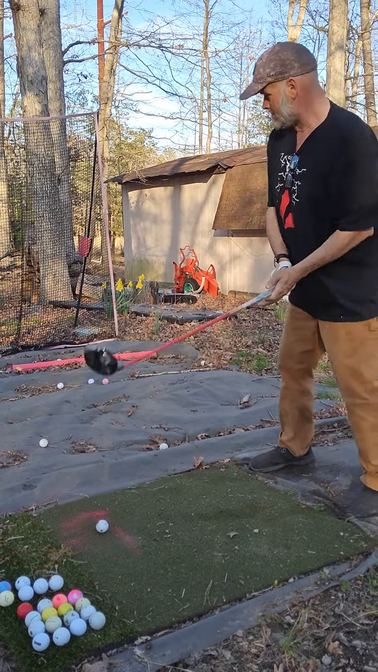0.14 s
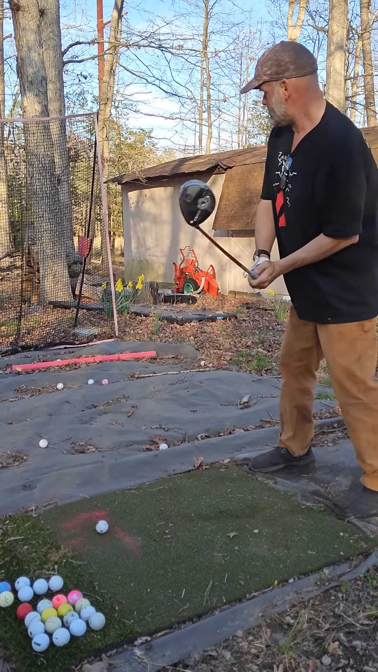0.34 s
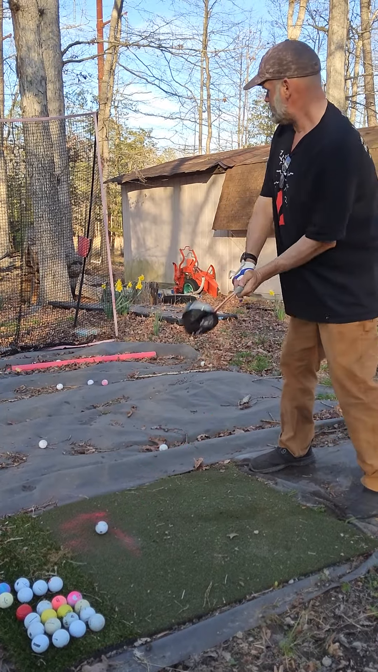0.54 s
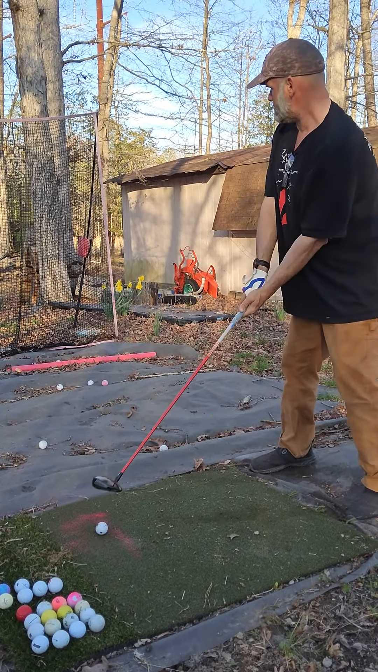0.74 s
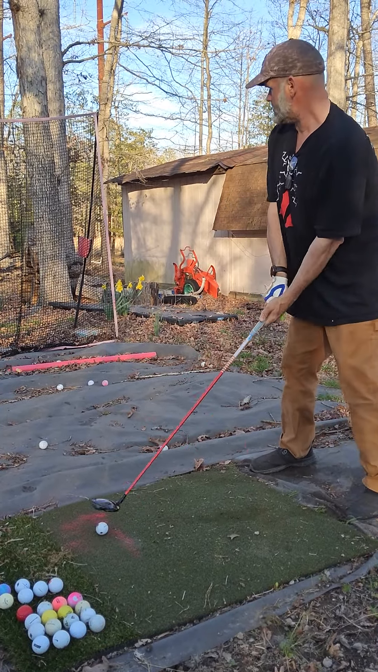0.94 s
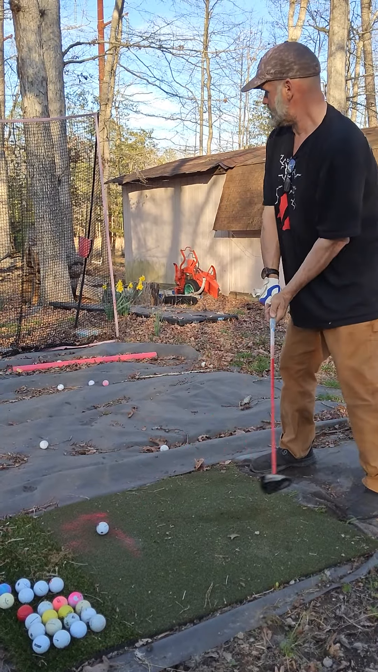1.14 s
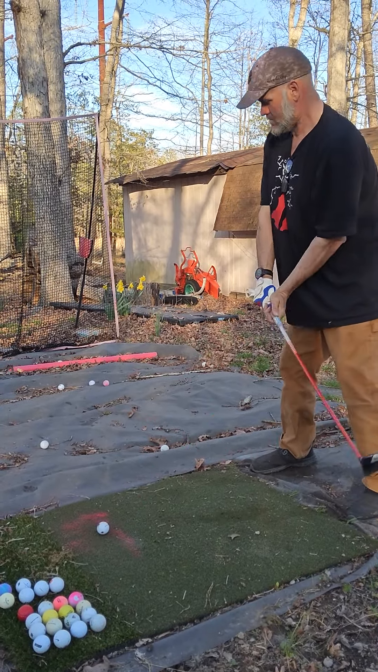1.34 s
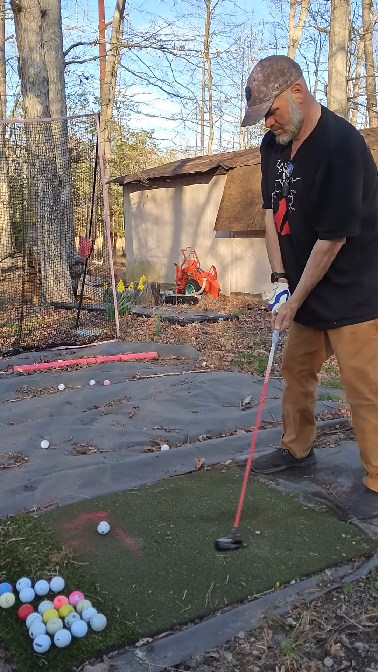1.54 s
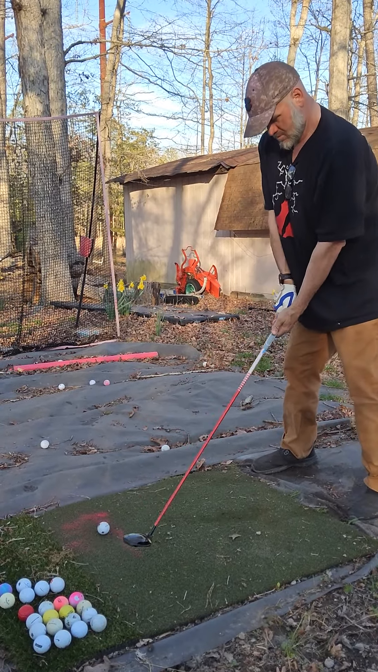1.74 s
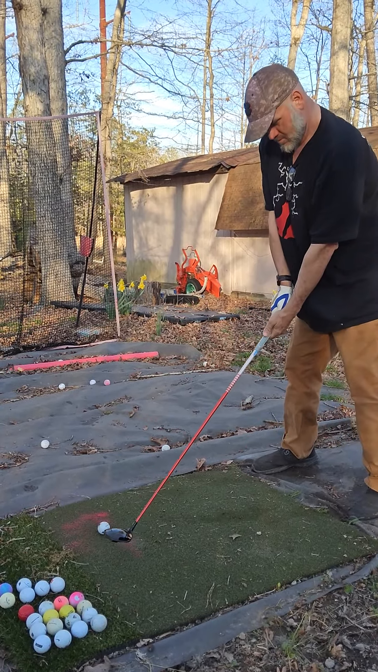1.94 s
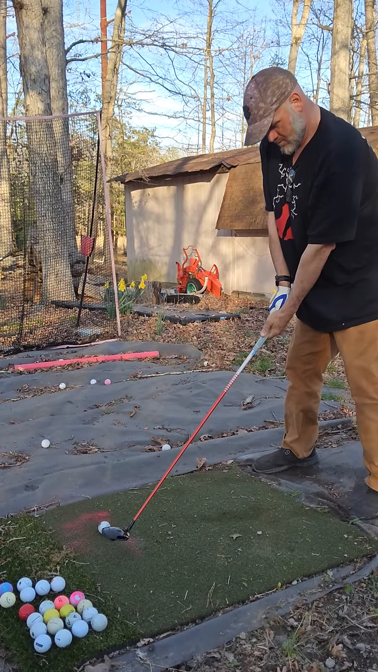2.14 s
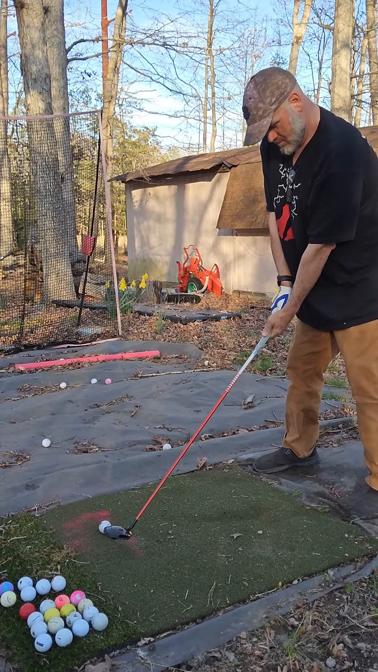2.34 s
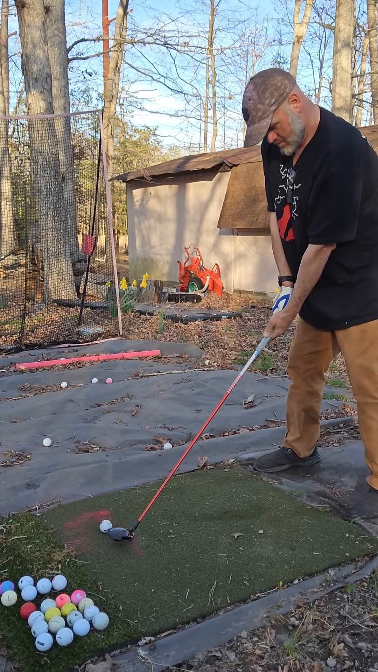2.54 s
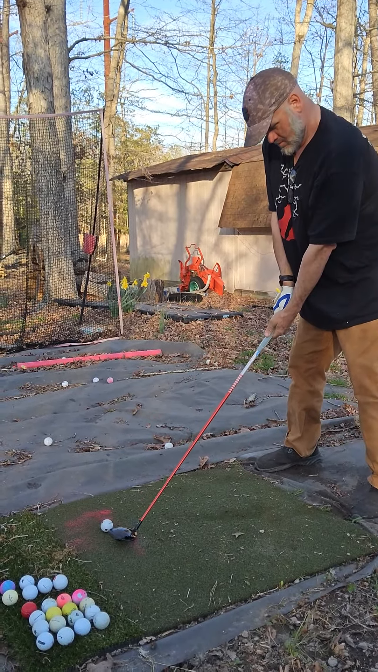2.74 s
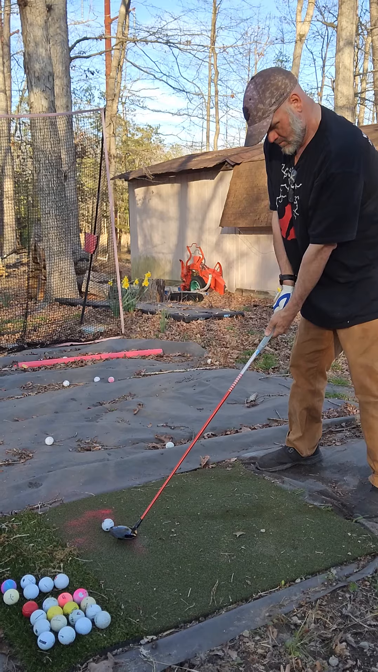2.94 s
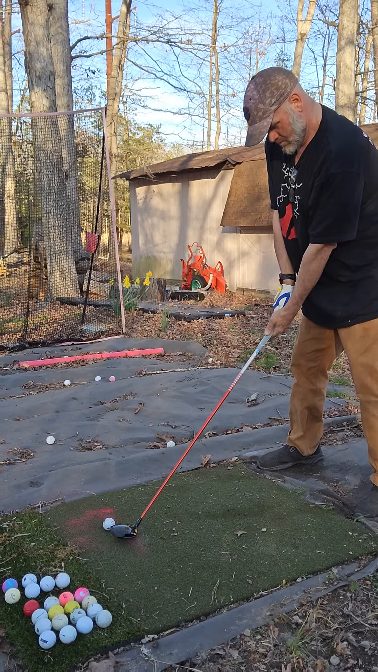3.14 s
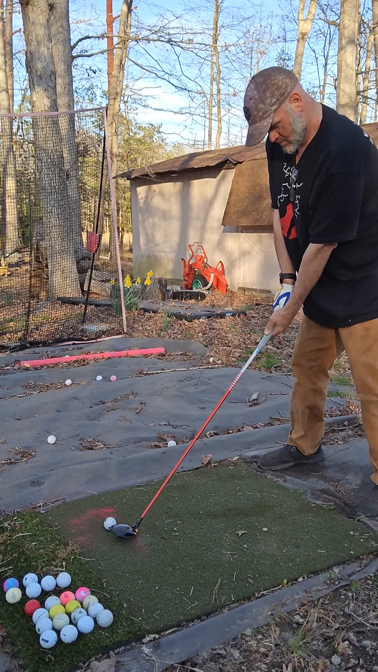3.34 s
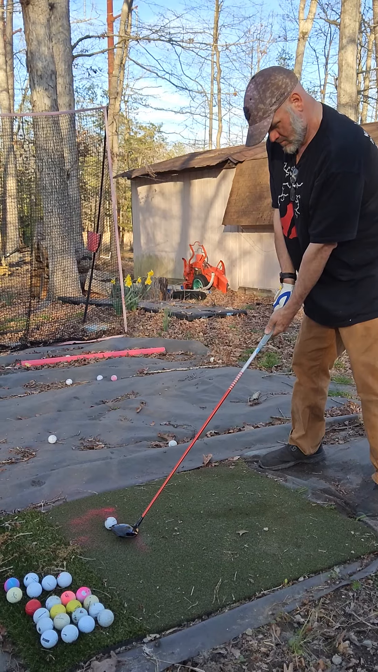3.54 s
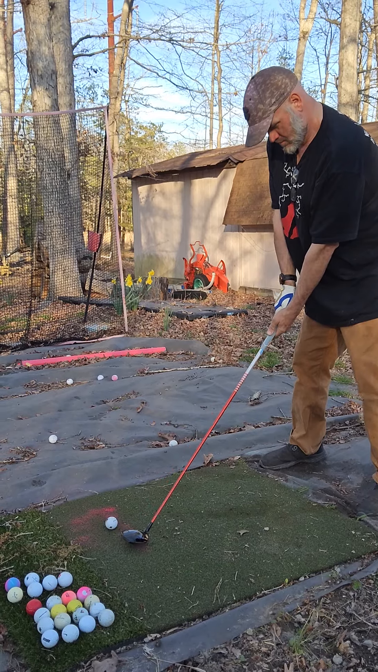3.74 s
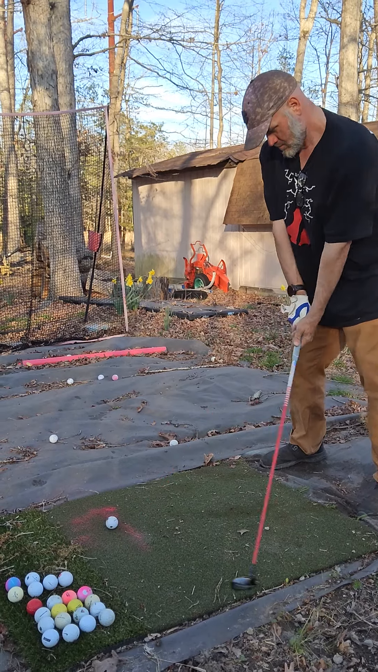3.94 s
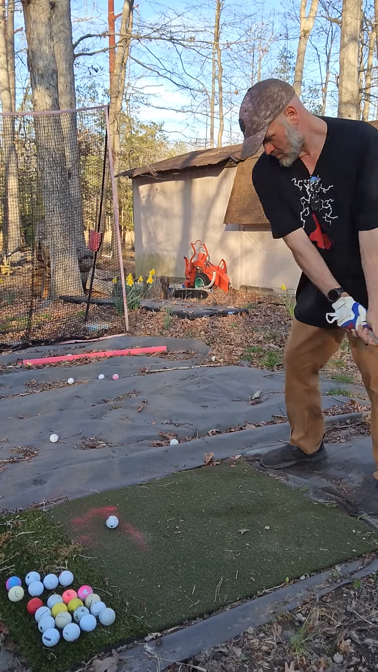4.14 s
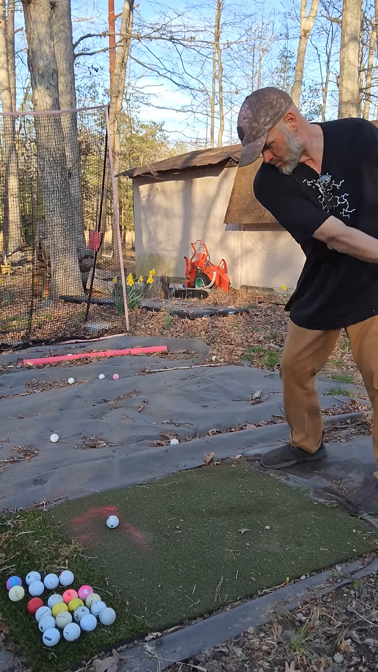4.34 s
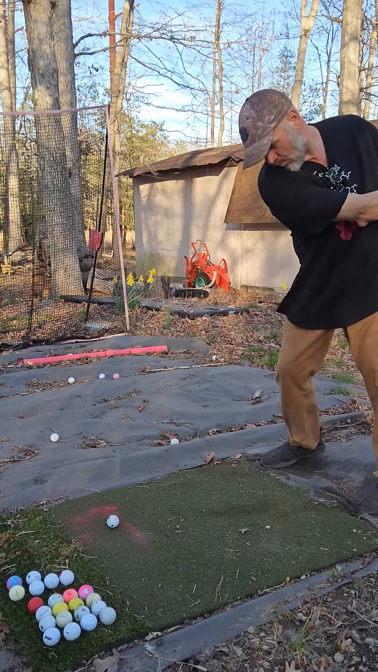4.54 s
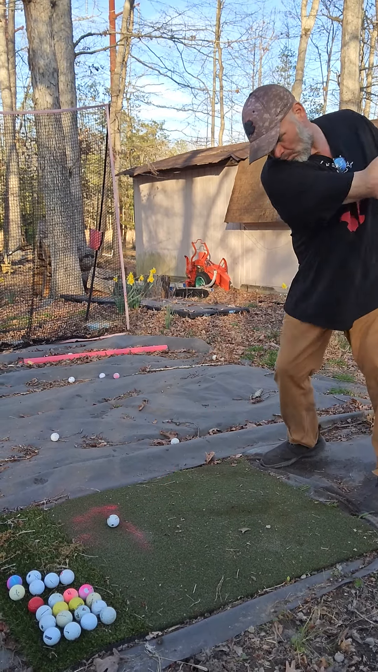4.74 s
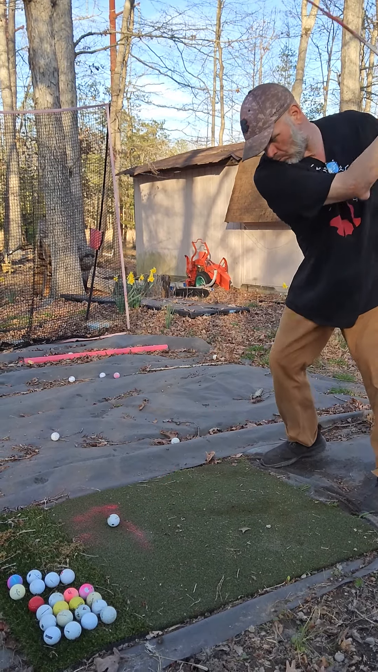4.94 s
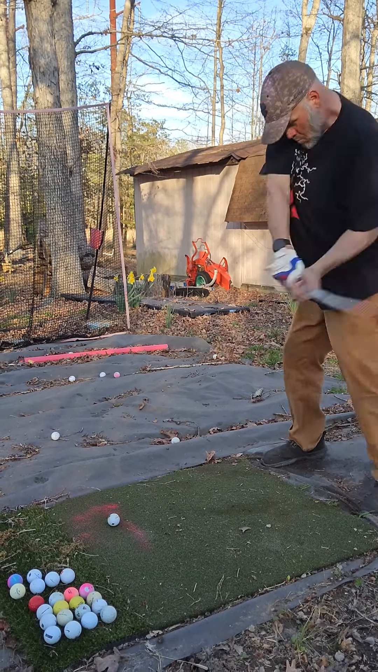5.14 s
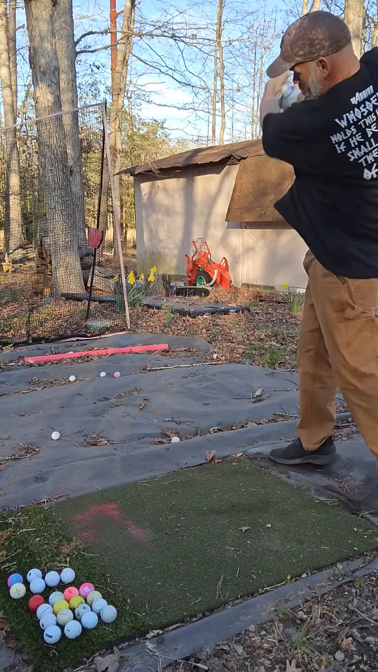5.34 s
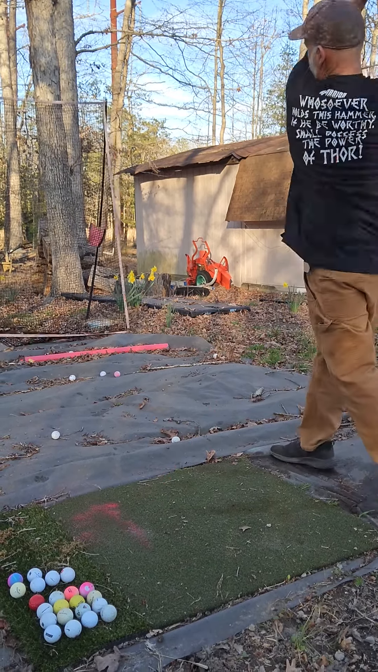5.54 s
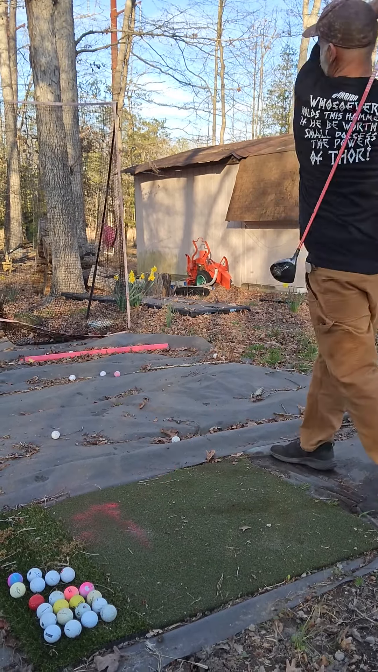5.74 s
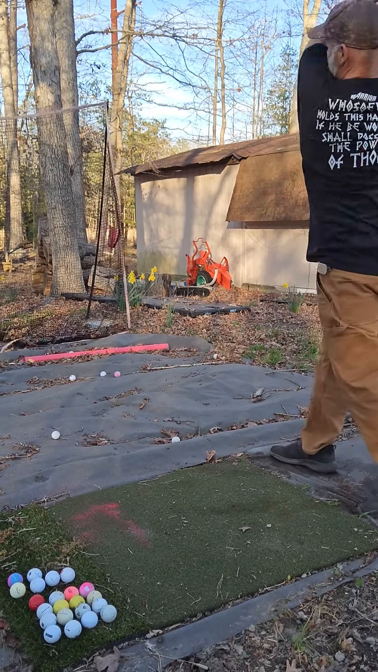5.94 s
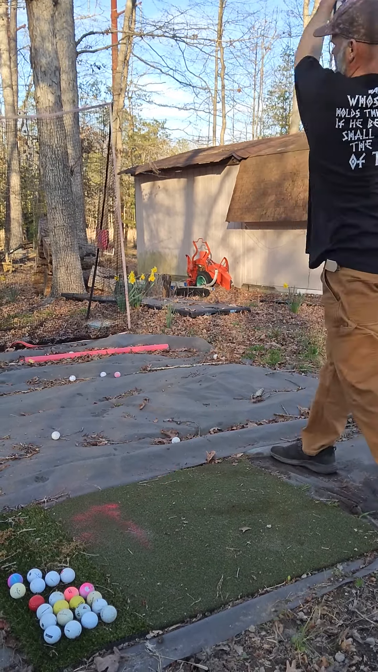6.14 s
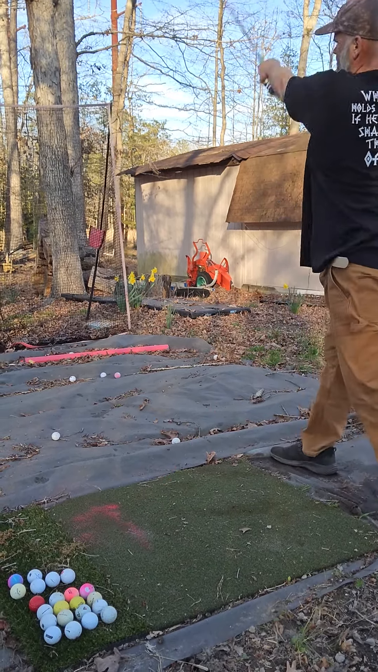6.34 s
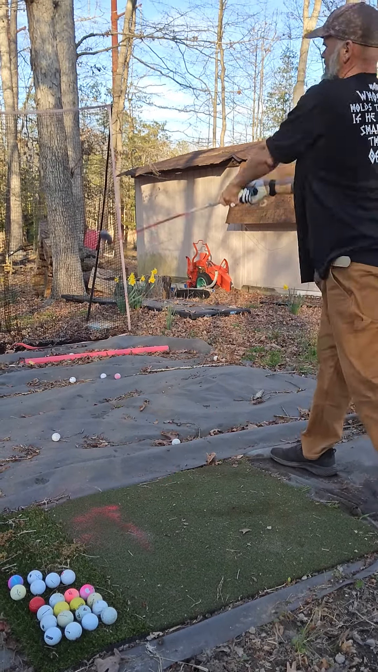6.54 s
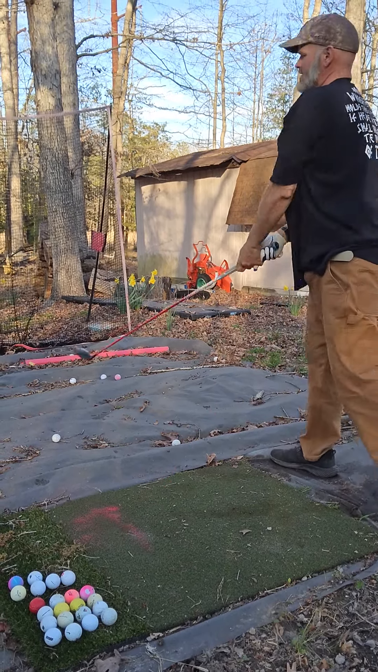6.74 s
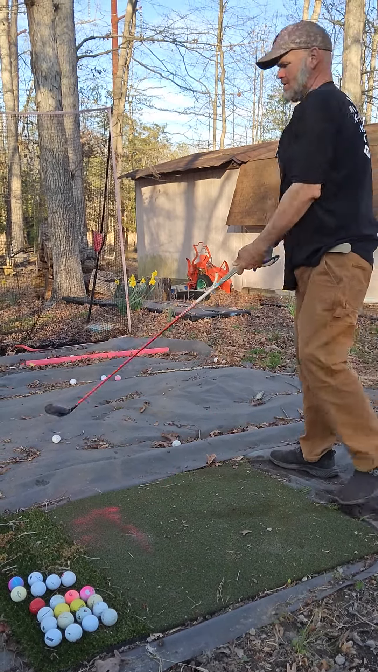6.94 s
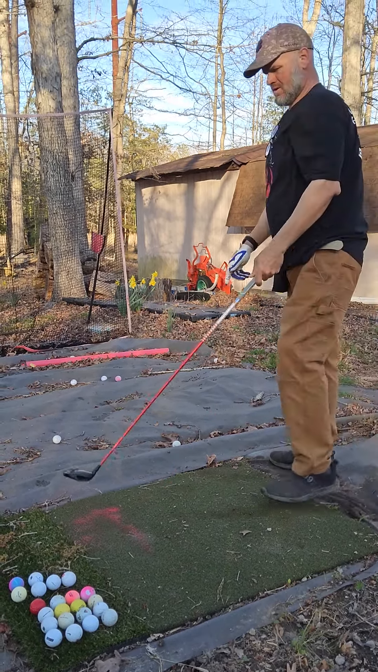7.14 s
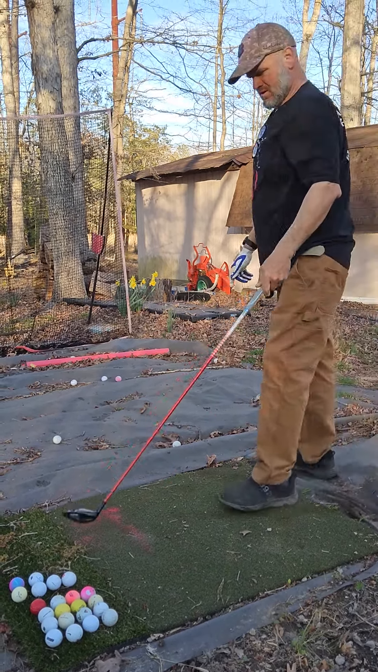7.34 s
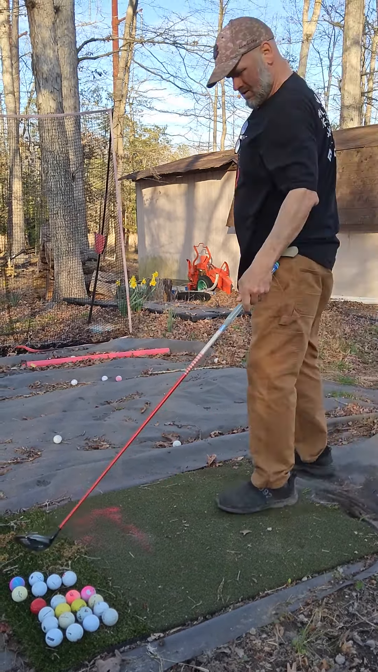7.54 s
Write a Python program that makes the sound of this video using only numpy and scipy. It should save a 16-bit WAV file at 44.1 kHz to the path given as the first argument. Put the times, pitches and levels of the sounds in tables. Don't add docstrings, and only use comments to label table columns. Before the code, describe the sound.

A near microphone in a backyard among trees picks up low distant traffic, faint hiss, bird chips and a quick trill. After a long quiet wait comes a split-second whoosh and one hard, hollow-metal crack that dominates everything, scattering off the trunks. The ball slaps into netting a tenth of a second later; netting and sheet rustle and settle, the ball drops with a soft pat, and gritty steps finish.

```python
import sys
import numpy as np
from scipy import signal
from scipy.fft import rfft, irfft, next_fast_len
from scipy.io import wavfile
from scipy.ndimage import uniform_filter1d

SR = 44100
rng = np.random.default_rng(int(sys.argv[2]) if len(sys.argv) > 2 else 0)


def elevation(decibels):
    levels = np.asarray(decibels, float)
    return 10 ** (levels / 20)


def dump_mix(stems):
    frames = np.atleast_2d(stems).T
    limited = np.clip(frames, -1, 1)
    pcm = np.round(limited * 32767).astype(np.int16)
    wavfile.write(sys.argv[1], SR, pcm)


N = 339129

# time_s, level_db
TRAFFIC = [(0, -62), (1.2, -65), (2.2, -66), (2.9, -69), (3.7, -68.5), (4.6, -71), (5.2, -69), (6.2, -75.5),
           (7.0, -70.5), (7.69, -77)]
# time_s, level_db
RUMBLE_SWELL = [(0, -2.5), (1.0, -0.5), (1.7, 1), (2.6, 0), (3.7, 0), (4.3, -2), (4.7, -2.5), (5.2, 3.5),
                (5.75, -1.5), (6.4, -1.5), (7.0, -0.5), (7.69, -3.5)]
# frequency_hz, density_db
RUMBLE_COLOUR = [(12, -46), (20, -14.5), (34, -3), (83, 1.5), (113, -2), (152, -12.5), (184, -14.5),
                 (259, -19), (294, -25), (338, -27), (420, -37.5), (550, -60.5), (920, -120)]
WASH_COLOUR = [(180, -42), (300, -11), (405, -9), (828, 0.5), (1510, -6), (1920, -17), (2400, -21.5),
               (3410, -28.5), (3770, -43), (6000, -47), (7800, -68.5), (13200, -120)]
HISS_COLOUR = [(2120, -21.5), (3600, -3), (3670, -5), (7660, -15.5), (10800, -16.5), (15100, -11.5),
               (16000, -13)]
# frequency_hz, likeness (-1 to 1)
LIKENESS = [(60, 0.99), (150, 0.92), (380, 0.71), (950, 0.38), (2380, -0.35), (5980, -0.2), (15000, 0.044)]
# time_s, firing_hz, level_db
ENGINES = [
    [(0, 154, -62.5), (1.2, 156, -62.5), (2.4, 151, -59), (2.65, 146.3, -59.5), (4.3, 139.5, -59.5),
     (4.6, 140.6, -63), (5.1, 133, -70), (5.4, 134, -89)],
    [(.55, 86, -78), (.75, 85.2, -50), (1.4, 85.87, -61), (1.6, 79, -58), (2.3, 76.1, -55.5),
     (2.55, 73.3, -77)],
    [(7.1, 166, -88.5), (7.25, 163.4, -60.5), (7.69, 154, -65.5)],
]
# time_s, level_db
WHINE = [(0, -80), (.6, -86), (1.2, -85), (1.7, -78), (2.3, -82.5), (2.44, -71.5), (2.55, -87), (2.8, -110)]

# time_s, pitch_hz, level_db
NEAR_BIRD = [
    [(4.787, 2200, -81.5), (4.8, 2610, -76.5), (4.812, 2350, -72.5), (4.828, 2800, -64.5),
     (4.84, 2210, -69), (4.85, 2460, -66), (4.862, 2214, -66.5), (4.89, 2010, -70.5), (4.905, 1880, -83.5)],
    [(4.998, 2795, -82.5), (5.012, 2620, -70.5), (5.03, 2450, -61.5), (5.046, 1990, -75),
     (5.054, 1950, -77.5), (5.064, 2080, -60.5), (5.078, 2170, -65.5), (5.09, 2100, -73),
     (5.098, 1980, -79)],
]
# start_s, level_db, pitch_hz
CHIPS = [
    (.305, -77, 3410),
    (.797, -73.5, 3410),
    (1.255, -75, 3410),
    (1.694, -75, 3430),
    (2.137, -69, 3490),
    (2.572, -78, 3500),
]
# start_s, length_s, start_hz, end_hz, level_db
SLURS = [(.37, .10, 3000, 2960, -88), (.47, .2, 3130, 3020, -86), (1.65, .03, 3240, 3220, -82),
         (1.96, .04, 3240, 3260, -83), (2.92, .19, 3370, 2660, -81), (2.98, .18, 3250, 2680, -86),
         (3.10, .11, 2660, 2760, -84), (3.42, .2, 2310, 2260, -86), (3.60, .05, 2400, 2300, -80),
         (3.65, .09, 2310, 2270, -85), (4.008, .19, 3400, 2670, -82), (4.05, .15, 3280, 2680, -83),
         (4.18, .08, 2680, 2750, -88), (4.46, .09, 2620, 2580, -87)]
# top_s, peak_db
TRILL = [(2.122, -77), (2.2667, -72.5), (2.39, -69.5), (2.5033, -71.5), (2.6233, -71.5), (2.7392, -71.5),
         (2.844, -72.5), (2.9542, -71.5), (3.063, -72.5), (3.162, -72.5), (3.264, -71), (3.3715, -72.5),
         (3.486, -70)]

# time_s, level_db
FLUTTER = [(4.99, -85), (5.035, -71), (5.06, -67), (5.095, -66), (5.11, -75), (5.14, -77), (5.16, -95)]
# start_s, length_s, start_hz, end_hz, level_db
VORTICES = [
    (5.128, .022, 440, 500, -53),
    (5.140, .020, 500, 590, -43),
    (5.154, .026, 590, 680, -25),
    (5.1785, .013, 640, 720, -24),
    (5.1905, .021, 750, 725, -22.5),
    (5.2122, .0090, 700, 690, -20),
    (5.2190, .005, 520, 450, -30),
]
# time_s, level_db
SWISH = [(5.10, -90), (5.135, -69), (5.156, -57), (5.172, -42), (5.192, -33), (5.21, -33), (5.2165, -36),
         (5.2185, -58), (5.2225, -52), (5.228, -50), (5.24, -65)]
# frequency_hz, density_db
SWISH_COLOUR = [(60, -30), (120, -17), (300, -5), (700, -9), (1300, -12), (2200, -14), (3600, -20),
                (5700, -27), (8000, -35), (10500, -33), (16000, -38.5)]
# centre_s, level_db, pitch_hz, length_cycles, sign
PUSHES = [(5.2249, -10.5, 400, 1.0, 1), (5.2275, -25, 220, .9, 1), (5.2255, -24, 1900, 2.0, 1),
          (5.2205, -33, 2000, 7, 1), (5.2170, -36, 2300, 5, 1), (5.2258, -24, 900, 1.0, -1),
          (5.2400, -36, 150, 1.5, 1), (5.2520, -38, 160, 1.5, -1), (5.3195, -29, 72, 1.7, -1),
          (5.3193, -27, 230, .8, -1), (5.3181, -25, 900, 1.0, -1), (5.3090, -30, 600, 1.3, -1),
          (5.3304, -23, 720, 2.6, -1), (5.3343, -32, 800, 1.5, 1), (5.3550, -39, 110, 1.2, 1),
          (5.3120, -40, 150, 1.5, 1), (5.3420, -35, 210, 1.5, 1), (6.0405, -40, 400, 1.4, 1),
          (6.0415, -45, 750, 2.0, 1), (6.7270, -58, 1200, 2.5, 1), (6.8010, -48, 1250, 1.6, 1),
          (6.9000, -60, 1400, 2.5, 1)]
# pitch_hz, level_db, t60_s
HEAD = [(1950, -3.5, .005), (2900, -8, .004), (4300, -13, .006), (5440, -9, .014), (6750, -2, .009),
        (7900, -9, .004), (9220, -10, .004), (10400, -6, .009), (11000, -9, .006), (12300, -15, .005),
        (13600, -11, .006)]

# frequency_hz, density_db
RUSTLE_DULL = [(180, -40), (300, -5.5), (414, -14.5), (544, -7), (986, -4), (1600, -4.5), (2400, -5),
               (3300, -6.5), (5250, -30), (9830, -32.5), (10800, -40), (14000, -28)]
RUSTLE_BRIGHT = [(2060, -55.5), (3500, 6.5), (3970, 7.5), (5060, 7), (7950, 3.5), (9320, 2), (15100, -4),
                 (16000, -15.5)]
# top_s, level_db, rise_s, hold_s, t60_s
SLEEVES = (-4.5, 0, 0), [(4.05, -95.5, .2, 0.19, 3.5), (4.6, -91, 0.61, 0.073, 2.6),
           (5.2, -91.5, 0.38, .02, .05)]
NET = (-5.5, 2.3, -0.3), [(5.2315, -35, 0.001, 0.0088, 0.049), (5.242, -41, 0.0046, 0.015, 0.35),
       (5.378, -43.5, 0.13, 0.034, 0.57), (5.646, -60.5, 0.17, 0.018, 0.41)]
BALL_IN_NET = (1.5, -17.5, -.5), [(5.316, -39.5, .03, 0.0051, 0.15)]
SHEET = (-5, 5.2, -0.5), [(5.896, -54, 0.18, 0.044, 0.64), (6.04, -49.5, 0.0081, 0, 0.2),
         (6.17, -78.5, 0.0077, 0.0041, 0.067), (6.28, -75, 0.04, 0, 0.41), (6.352, -78, 0.064, 0.012, 1.15),
         (6.48, -90, 0.084, 0.095, 0.69)]
GRIT = (-8, -0.92, -0.59), [(6.58, -68, 0.061, 0.299, 0.13), (6.63, -85, .06, 0.022, .4),
        (6.8, -68, 0.0034, 0.011, 0.17), (6.93, -85, 0.045, 0.08, 0.53)]
GRAVEL = (-9.5, -3.1, 0.6), [(7.175, -67, 0.013, 0.032, 0.24), (7.222, -61, 0.044, 0.004, 0.24),
          (7.268, -65.5, 0.045, 0, .45)]
SCUFF = (1.86, -34, -1), [(6.74, -90.5, .04, 0.023, 0.42), (6.89, -78.5, 0.056, 0.012, 0.18),
         (6.97, -87, 0.12, 0.048, 0.68), (7.37, -73.5, 0.021, 0.04, 0.32), (7.405, -63, 0.06, 0.021, 0.47),
         (7.515, -67.5, 0.053, 0.013, 0.77), (7.68, -70.5, 0.17, .02, .5)]

# start_s, peak_db, left_right_db, pitch_hz, t60_s
SNAPS = [(5.3178, -37, -0.5, 1700, 0.012), (5.3191, -21, -4, 4600, 0.012), (5.3290, -21, -7, 4370, 0.015),
         (5.3497, -21.5, -4, 5450, 0.02), (5.863, -34, -3, 10000, 0.012), (5.8993, -39, -2, 2500, 0.028),
         (5.897, -35.5, -7, 9290, 0.026), (6.0377, -36, 5, 10100, 0.032), (6.04, -37.5, -19, 2920, 0.049),
         (6.0564, -47, 4.5, 5230, 0.012), (6.1709, -45, -10, 6200, 0.013), (6.1712, -51, -2, 10240, 0.012),
         (6.4565, -54, 0, 7660, 0.012), (6.559, -58, 1.5, 4490, 0.011), (6.6288, -45.5, 7, 12700, 0.0056),
         (6.627, -57, -4, 4120, 0.012), (6.657, -49, 0, 4660, 0.012), (6.7255, -40, -1, 6550, 0.0048),
         (6.7544, -55, -7, 4570, 0.012), (6.7715, -48, -1, 5180, 0.012), (6.8008, -36, 15, 4000, 0.006),
         (6.897, -49.5, -1, 4650, 0.013), (7.172, -55, -7, 3510, 0.012), (7.177, -56, 5, 9600, 0.011),
         (7.187, -49, 0.5, 5180, 0.02), (7.2124, -44, -4, 5100, 0.05), (7.274, -52, -13, 4020, 0.014),
         (7.39, -46.5, -9, 4800, 0.023), (7.378, -57.5, -1.5, 2190, 0.012), (7.466, -49, -6, 6500, 0.01),
         (7.506, -61, -3.5, 2120, 0.012), (7.58, -58, -9, 7500, 0.0096), (7.633, -47, -7, 2340, 0.018),
         (7.648, -47.5, -4, 2980, 0.018)]
# start_s, peak_db, left_right_db, pitch_hz, t60_s
MAT_GRIT = [
    (5.2238, -30, 0, 13000, .010),
    (5.2243, -27, -3, 3300, .008),
    (5.2248, -20, 0, 9500, .008),
    (5.2258, -26, 0, 5800, .005),
    (5.2261, -24, -2, 9500, .004),
]
# start_s, peak_db, left_right_db, pitch_hz, t60_s
CLOTH_TICKS = [
    (1.0854, -75, 1.0, 8820, 0.015),
    (1.5494, -71, 0.0, 12100, 0.015),
    (4.0372, -72, -2.0, 10100, 0.017),
    (4.0544, -61, -1.6, 9240, 0.013),
    (4.2274, -70, -0.15, 13100, 0.014),
    (4.8784, -74, 1, 10610, 0.02),
]
# start_s, peak_db, left_right_db, pitch_hz, t60_s
SETTLING = [(5.368, -20, -4, 4800, .015), (5.4555, -38, 0, 5500, .012), (5.557, -44, -1, 1490, .008),
            (5.596, -44, 0, 5000, .01), (5.728, -38.5, -1, 6730, 0.0088), (5.813, -50, -2, 5260, 0.013),
            (7.1573, -63, 2, 1092, 0.013), (7.3584, -46, -2, 1015, .015), (7.403, -48, -5, 1290, .02),
            (7.465, -49, -5, 1020, .02), (7.512, -50, -7, 1520, .015), (7.5704, -49.5, -3, 1334, 0.014)]

# centre_hz, width_hz, lift_db
PORTS = [(2700, 100, -1), (3420, 240, 2), (5100, 230, 1), (9670, 300, 3)]
# frequency_hz, left_right_db
SHADING = [(1200, 0), (2000, -1.5), (3000, -5), (4300, -4), (5500, 1), (7500, 3), (13000, 3.5)]

STRIKE_S, STRIKE_DB, STRIKE_LAG = 5.2299, -6, 4.0
HEAD_LAG, NET_LAG = 6, -5


def rms_one(x):
    return x / np.sqrt(np.mean(x ** 2) + 1e-20)


def in_time(rows):
    s, *columns = np.transpose(rows)
    return [np.interp(np.arange(N) / SR, s, c) for c in columns]


def at_hz(points, hz):
    table_hz, values = np.array(points)[:, :2].T
    return np.interp(np.log(hz), np.log(table_hz), values)


def drift(rate):
    r = np.exp(-40 * np.pi * rate / SR)
    white = rng.standard_normal(N // 20 + 4002)
    slow = signal.lfilter([1], [1, -2 * r, r * r], white)[4000:]
    return np.interp(np.arange(N) / 20, np.arange(len(slow)), rms_one(slow))


def stereo_noise():
    return rng.standard_normal((2, N))


def filtered(x, order, hz, kind):
    return signal.sosfilt(signal.butter(order, hz, kind, fs=SR, output="sos"), x)


def ring(clicks, hz, t60):
    r = elevation(-60 / (t60 * SR))
    w = 2 * np.pi * min(hz, .45 * SR) / SR
    return signal.lfilter([0, np.sin(w)], [1, -2 * r * np.cos(w), r * r], clicks)


def add(out, s, sound):
    i = round(s * SR)
    out[..., i:i + sound.shape[-1]] += sound[..., :N - i]


def coloured(white, spectrum):
    size = next_fast_len(white.shape[1])
    hz = np.maximum(np.arange(size // 2 + 1) * SR / size, 1)
    alike = np.clip(at_hz(LIKENESS, hz), -1, 1)
    mid, side = rfft(white, size) * elevation(at_hz(spectrum, hz)) * np.sqrt([1 + alike, 1 - alike])
    return rms_one(irfft(np.array([mid + side, mid - side]), size)[:, :white.shape[1]])


def sine(hz):
    return np.sin(2 * np.pi * np.cumsum(hz) / SR)


def whistle(length, start_hz, end_hz, arch_hz=0, edge=0.17):
    u = np.linspace(0, 1, round(length * SR))
    hz = start_hz + (end_hz - start_hz) * u + 4 * arch_hz * u * (1 - u)
    return sine(hz) * signal.windows.tukey(len(u), np.clip(edge, 0, 1))


def trees(x, t60, cut_hz):
    t = np.arange(round(1.0 * SR)) / SR
    tail = rng.standard_normal((2, len(t))) * elevation(-60 * t / t60) * np.minimum(t / 0.0026, 1)
    tail = filtered(tail, 1, [250, cut_hz], "band")
    return signal.oaconvolve(x[None], tail / np.sqrt(np.sum(tail ** 2) / 2), axes=1)[:, :N]


def ports(x):
    size = next_fast_len(N)
    hz = np.arange(1, size // 2 + 2) * SR / size
    lift_db = sum(db * np.exp(-.5 * ((hz - centre_hz) / width_hz) ** 2) for centre_hz, width_hz, db in PORTS)
    sides_db = at_hz(SHADING, hz) * [[.5], [-.5]]
    return irfft(rfft(x, size) * elevation(lift_db + sides_db), size)[:, :N]


def rumble(change_db):
    level_db = -53 + 0.078 * change_db + in_time(RUMBLE_SWELL)[0] + 1.3 * drift(14.0)
    return elevation(level_db) * coloured(stereo_noise(), RUMBLE_COLOUR)


def tyre_wash(wash_db, change_db):
    wash = coloured(stereo_noise(), WASH_COLOUR)
    top = filtered(wash, 2, 1500, "high")
    top_gain = elevation(-1 - 0.1 * change_db)
    return elevation(wash_db + 0.55 * drift(8.9)) * (wash + (top_gain - 1) * top)


def engines():
    out = np.zeros(N)
    for rows in ENGINES:
        hz, db = in_time(rows)
        out += elevation(db + 0.69 * drift(3.8)) * sine(hz + .6 * drift(2.8))
    return out


def background():
    wash_db, = in_time(TRAFFIC)
    change_db = wash_db - wash_db.mean()
    traffic = rumble(change_db) + tyre_wash(wash_db, change_db) + engines()
    hiss = elevation(-85) * coloured(stereo_noise(), HISS_COLOUR)
    return traffic * elevation([[-.4], [.4]]) + hiss


def whine():
    noise = rms_one(ring(stereo_noise(), 1880, .029))
    return elevation(in_time(WHINE)[0] + 1.4 * drift(4.6)) * noise


def near_bird():
    out, t = np.zeros(N), np.arange(N) / SR
    for call in NEAR_BIRD:
        hz, db = uniform_filter1d(in_time(call), size=200)
        out += elevation(db) * sine(hz) * (t > call[0][0]) * (t < call[-1][0])
    return out


def far_birds():
    out = np.zeros(N)
    notes = [(s, .045, hz, hz - 90, db) for s, db, hz in CHIPS]
    notes += [(s + .035, .06, 3330, 2900, db - 13) for s, db, hz in CHIPS]
    for s, length, start_hz, end_hz, db in notes + SLURS:
        note = whistle(length, start_hz, end_hz, .17 * (end_hz - start_hz))
        add(out, s, elevation(db + np.linspace(0, -2, len(note))) * note)
    return out * (.95 + .2 * drift(70))


def flick(top_hz, hold):
    t = np.arange(-.035 * SR, (hold + .01) * SR) / SR
    held = np.maximum(t, 0) / hold
    up = uniform_filter1d(np.clip(1 + t / .021, 0, 1) ** 1.3, size=200)
    hz = top_hz * (.6 + .4 * up) - 70 * held ** 2
    level = elevation(-10 * (1 - up ** 2) - 4 * held)
    fade = np.clip((t + .03) / .012, 0, 1) * signal.windows.tukey(len(t), .25)
    return level * fade * sine(hz)


def trill():
    out = np.zeros(N)
    for s, db in TRILL:
        elapsed = s - TRILL[0][0]
        note = flick(3275 - 150 * elapsed, .028 - .014 * elapsed)
        add(out, s - .033, elevation(db - 3) * note)
    return out


def birds():
    near, far, flicks = near_bird(), far_birds(), trill()
    wall_echo = elevation(-15) * np.roll(flicks, round(.042 * SR))
    direct = near * elevation([[-3], [3]]) + (elevation(-1.5) * far + flicks + wall_echo) * elevation([[-1], [1]])
    blur = .75 + .4 * drift(60)
    haze = trees(elevation(-3) * near + elevation(-3) * far, t60=.65, cut_hz=6000)
    haze = haze + trees(elevation(-3.5) * flicks, t60=.4, cut_hz=6000)
    return direct + blur * haze


def strokes(rows):
    t, power = np.arange(0, N + 16, 16) / SR, 0
    for s, db, rise, hold, t60 in rows:
        rise_db = 20.5 * np.maximum(s - t, 0) / max(rise, .001)
        decay_db = 60 * np.maximum(t - s - hold, 0) / max(t60, .01)
        power = power + elevation(2 * (db - rise_db - decay_db))
    return np.interp(np.arange(N) / SR, t, power)


def rustle():
    dull_power = low_power = high_power = 0
    for (dull_db, crisp_db, pan_db), rows in (SLEEVES, NET, BALL_IN_NET, SHEET, GRIT, GRAVEL, SCUFF):
        power = strokes(rows) * elevation([[pan_db], [-pan_db]])
        dull_power = dull_power + elevation(2 * dull_db) * power
        low_power = low_power + power
        high_power = high_power + elevation(2 * crisp_db) * power
    grains = stereo_noise() * elevation(2.3 * np.minimum(rng.exponential(1, N), 5))
    clumps = elevation(1.2 * drift(40) + 1.3 * drift(300))
    dull = elevation(5.5) * np.sqrt(dull_power) * coloured(grains, RUSTLE_DULL)
    bright = coloured(grains[::-1], RUSTLE_BRIGHT)
    below = signal.sosfiltfilt(signal.butter(2, 7500, fs=SR, output="sos"), bright)
    crisp = np.sqrt(low_power) * below + np.sqrt(high_power) * (bright - below)
    return clumps * (dull + elevation(2.5) * crisp)


def snaps():
    out, t = np.zeros((2, N)), np.arange(round(.06 * SR)) / SR
    for s, db, pan_db, hz, t60 in SNAPS + MAT_GRIT + CLOTH_TICKS + SETTLING:
        burst = np.diff(rng.standard_normal((2, len(t) + 1))) * elevation(-60 * t / max(t60, .002))
        burst[:, 0] += 1.5
        body = ring(burst.mean(axis=0), hz, 9 / hz)
        add(out, s, elevation(db - 3.0) * (0.18 * burst + 0.37 * body) * elevation([[pan_db / 2], [-pan_db / 2]]))
    return out


def pushes():
    out, t = np.zeros((2, N)), np.arange(-2000, 2000) / SR
    for s, db, hz, cycles, sign in PUSHES:
        bell = np.exp(-(2 * t * hz / cycles) ** 2)
        push = sign * elevation(db) * np.cos(2 * np.pi * hz * t) * bell
        lag = HEAD_LAG if s < STRIKE_S else NET_LAG
        add(out, s + t[0], np.array([np.roll(push, lag), push]))
    return out


def flutter():
    throb = .5 + .5 * np.cos(2 * np.pi * 85 * np.arange(N) / SR)
    dull = filtered(rng.standard_normal(N), 4, [600, 1500], "band")
    return elevation(in_time(FLUTTER)[0]) * rms_one(throb * dull)


def swing():
    tone = np.zeros(N)
    for s, length, start_hz, end_hz, db in VORTICES:
        add(tone, s, elevation(db) * whistle(length, start_hz, end_hz, edge=.65))
    sides = np.array([np.roll(tone, HEAD_LAG), tone]) * elevation([[.5], [-.5]])
    air = elevation(in_time(SWISH)[0]) * (np.arange(N) < SWISH[-1][0] * SR)
    return sides + air * coloured(stereo_noise(), SWISH_COLOUR)


def strike():
    t = np.arange(round(.08 * SR)) / SR
    chatter = .2 * rng.standard_normal((2, len(t))) * elevation(-60 * t / .024) * (t > .0005)
    force = .3 * chatter
    force[:, [0, 12]] += [.25, -.85]
    i = np.arange(len(t))
    force[0] = np.interp(i - STRIKE_LAG, i, force[0], left=0)
    modes = sum(elevation(db) * ring(force, hz, t60) for hz, db, t60 in HEAD)
    click = .45 * (force - 1.5 * np.roll(force, 3))
    out, blow = np.zeros((2, N)), np.zeros(N)
    add(out, STRIKE_S - .0003, elevation(STRIKE_DB) * (modes + click + chatter))
    out = filtered(out, 2, 1000, "high")
    out[0] -= 0.42 * filtered(out[0], 1, [2000, 4200], "band")
    add(blow, STRIKE_S, elevation(STRIKE_DB) * force[1])
    return out + elevation(6.5) * trees(blow, t60=0.84, cut_hz=9700)


def scene():
    near = ports(rustle() + snaps() + swing())
    return background() + whine() + birds() + near + pushes() + flutter() + strike()


def top_cut(x):
    return signal.sosfilt(signal.butter(12, 16970, fs=SR, output="sos"), x)


def record(dry):
    low_pass = signal.cheby2(12, 60, 1.06 * 15900, fs=SR, output="sos")
    mix = filtered(signal.sosfilt(low_pass, dry), 2, 36, "high")
    return top_cut(mix)


dry = scene()
out = record(dry)
dump_mix(out)
```